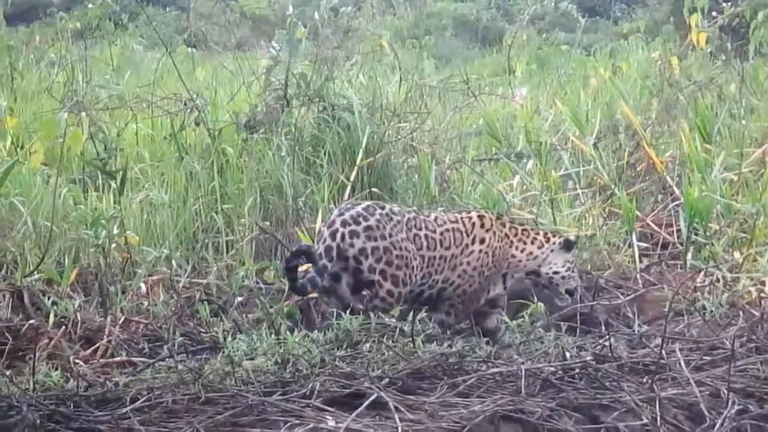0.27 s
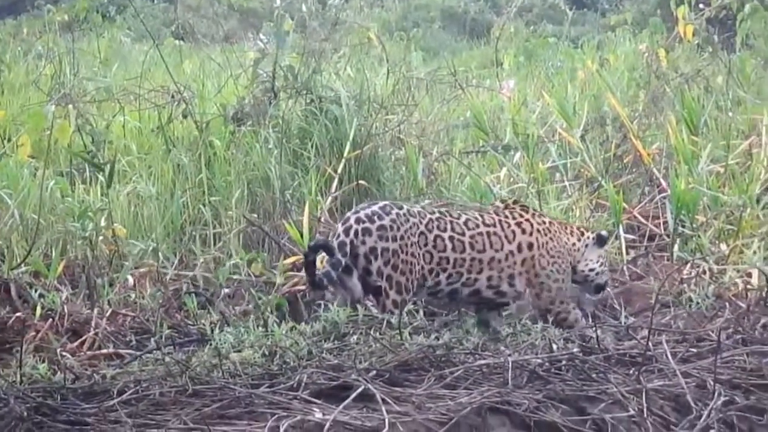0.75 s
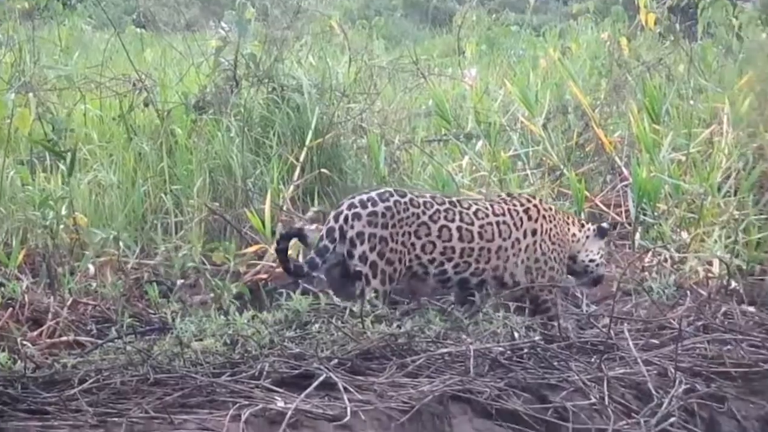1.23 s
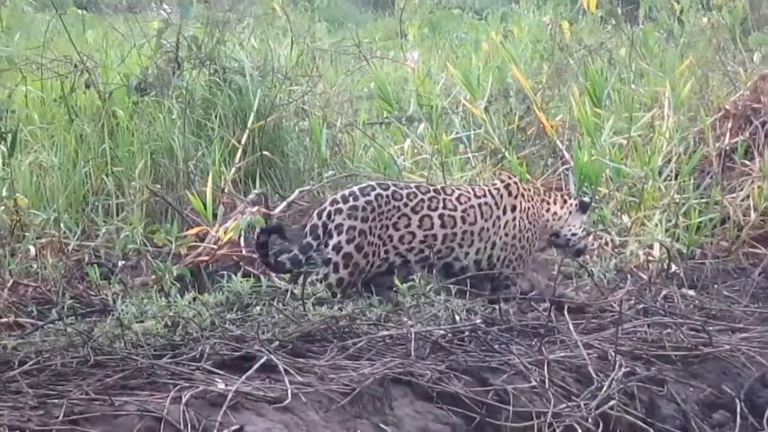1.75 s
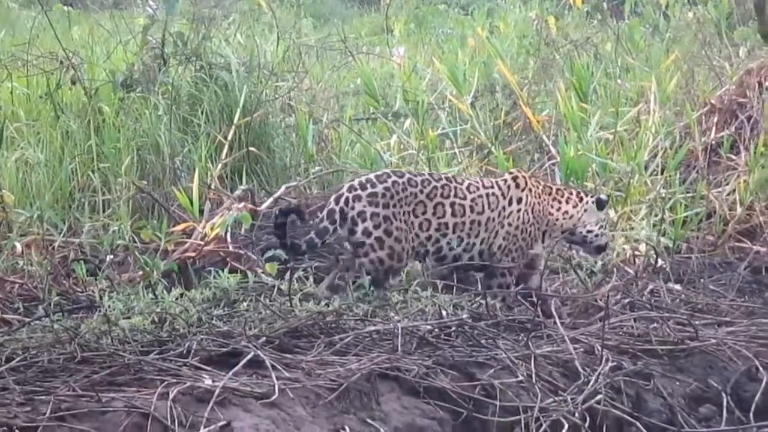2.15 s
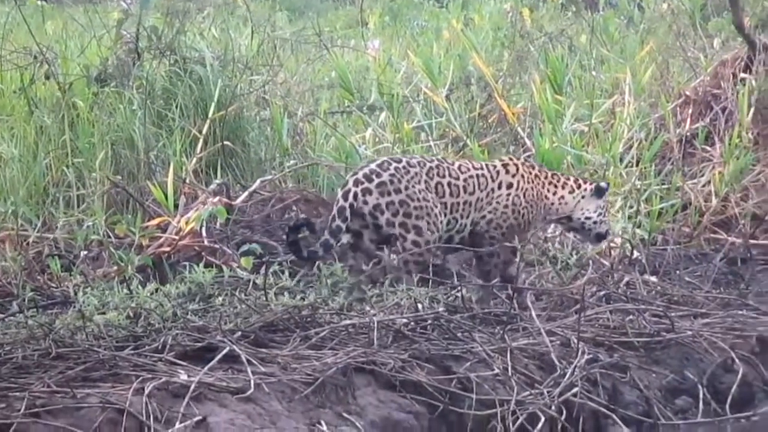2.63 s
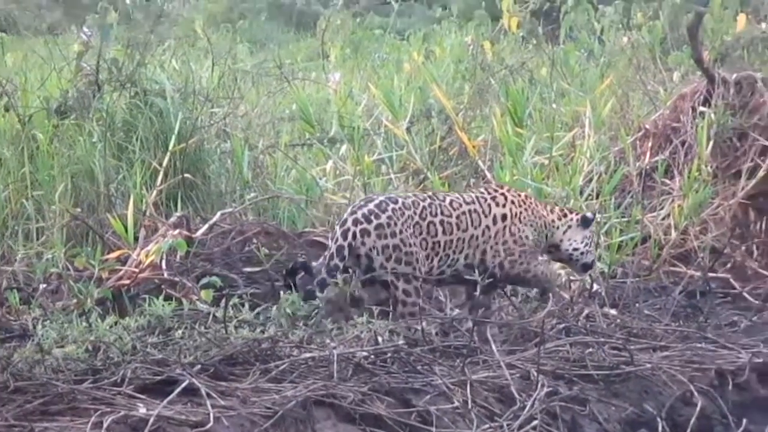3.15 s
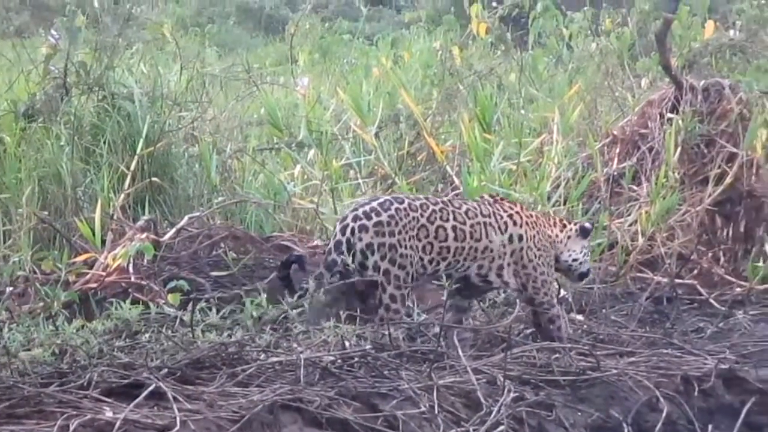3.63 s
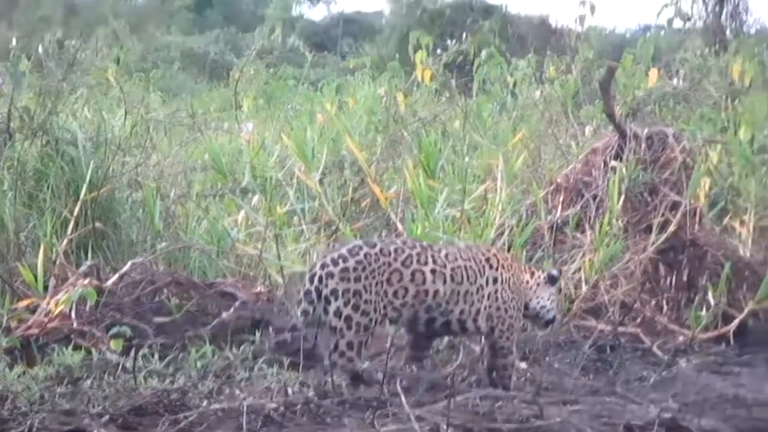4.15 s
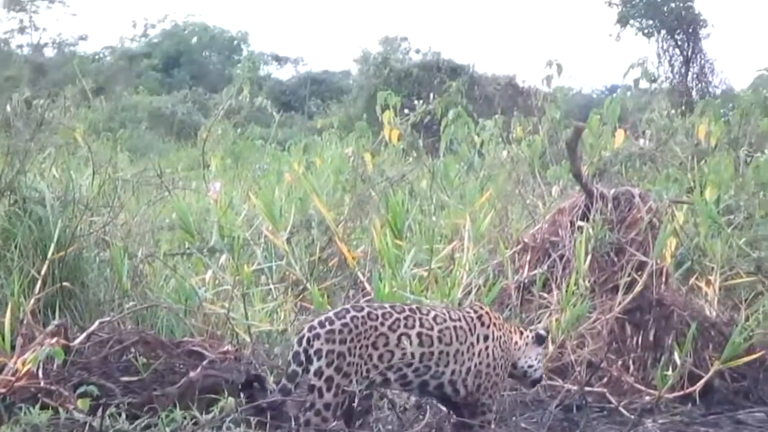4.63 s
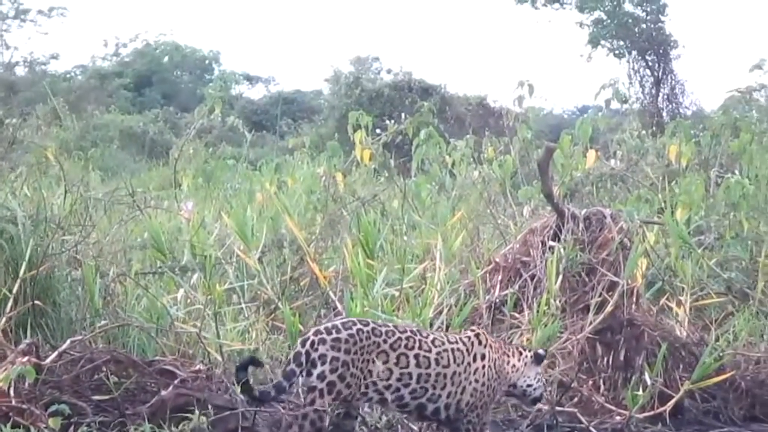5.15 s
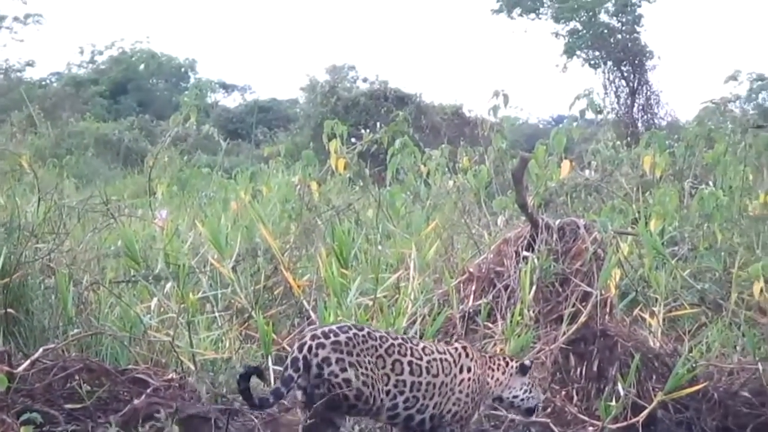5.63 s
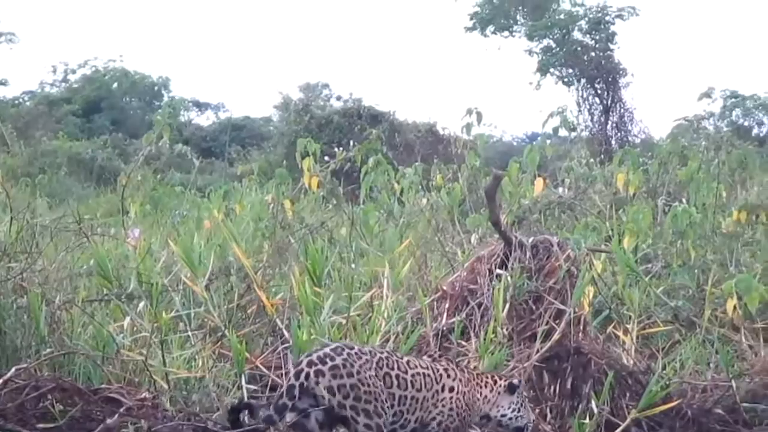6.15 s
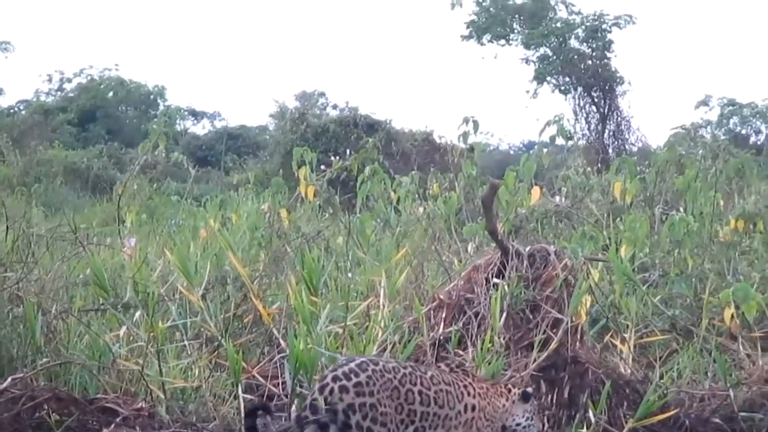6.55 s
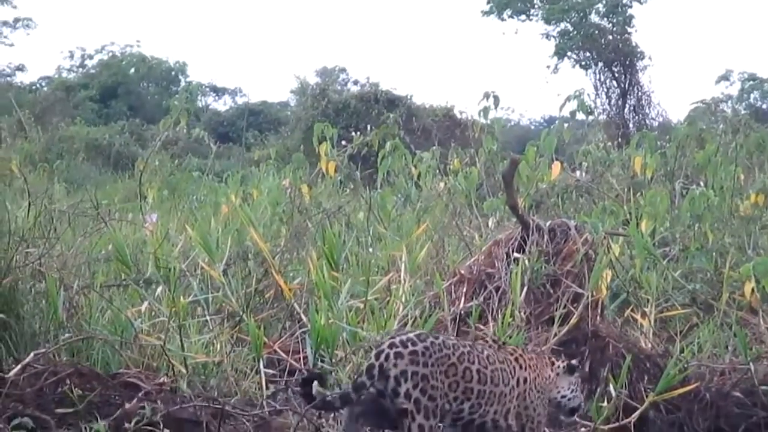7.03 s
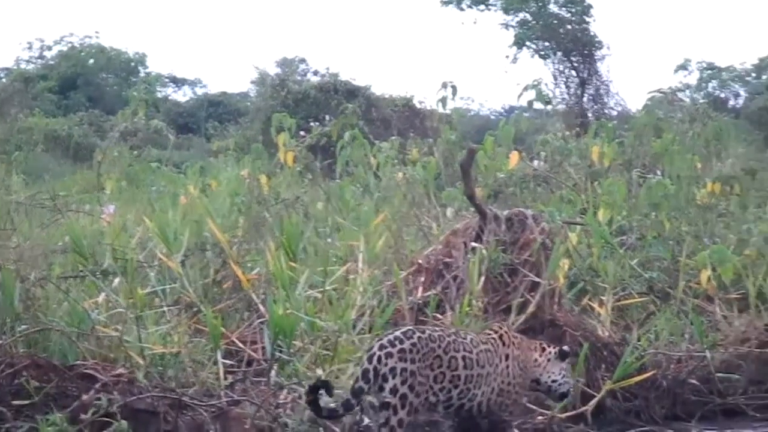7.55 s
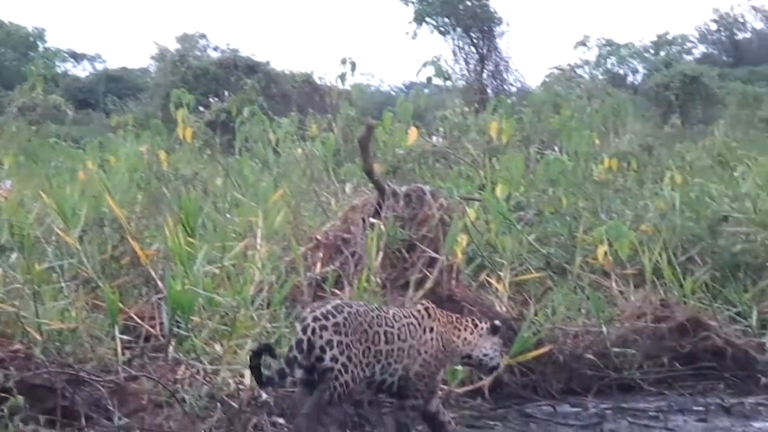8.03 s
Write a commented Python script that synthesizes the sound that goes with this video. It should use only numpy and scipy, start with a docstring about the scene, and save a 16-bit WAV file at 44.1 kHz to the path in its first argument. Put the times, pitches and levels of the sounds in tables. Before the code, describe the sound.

A bird gives rising, breaking squeals over quiet lapping water, small chirps and tiny ticks; one loud rattling knock bangs close by midway.

```python
"""Squealing bird by the reeds

A marshy river bank heard from a small boat. A bird repeats a rising, breaking squeal, built from harmonics
that a throat resonance lights up; small birds and insects, gliding and pulsed tones, call further off.
Water laps and drips, the reeds rustle and crack: shaped noise, and taps into short damped rings.
A lens mechanism ticks and whines near the microphone, and once something is shoved across the boat
with a loud, rattling knock: scraping grains, hull booms, clatter and crunch."""
import sys
import numpy as np
from scipy import signal
from scipy.fft import rfft, irfft
from scipy.io import wavfile
from scipy.ndimage import uniform_filter1d

SR = 44100
rng = np.random.default_rng(int(sys.argv[2]) if len(sys.argv) > 2 else 0)


def dump_mix(stems):
    """Bounce the given channels to the path in sys.argv[1] as a 16-bit WAV at rate SR."""
    frames = np.atleast_2d(stems).T  # one column per channel
    limited = np.clip(frames, -1, 1)  # hard clip at full scale
    pcm = np.round(limited * 32767).astype(np.int16)
    wavfile.write(sys.argv[1], SR, pcm)


N = 365148
T = np.arange(N) / SR


def undb(db):
    """Decibels to gain."""
    return 10 ** (np.asarray(db) / 20)


def unit(x):
    """Scale to rms 1."""
    return x / np.std(x)


def peak(x, db):
    """Scale to a peak level."""
    return x * undb(db) / np.abs(x).max()


def add(out, start_s, x):
    """Mix a short sound in at a start time."""
    i = max(int(start_s * SR), 0)
    out[i:i + len(x)] += x[:max(N - i, 0)]


def starting_at(x, start_s):
    """Turn a signal round so that it begins with what it held at start_s."""
    return np.roll(x, -int(start_s * SR))


def walk(rate_hz):
    """Smooth random wander with spread 1: noise low-passed at rate_hz."""
    lowpass = signal.butter(2, rate_hz, fs=SR, output="sos")
    settled = signal.sosfilt(lowpass, rng.standard_normal(N + SR))[SR:]
    return unit(settled)


def colour(x, points):
    """Shape by a (Hz, dB) spectrum; rms 1."""
    hz, db = np.transpose(points)
    f = np.maximum(np.arange(N // 2 + 1) * SR / N, 1)
    gain = undb(np.interp(np.log(f), np.log(hz), db))
    return unit(irfft(rfft(x) * gain, N))


def grains(rate, spread_db):
    """Random clicks, rate a second, most of them small; rms 1."""
    size = undb(spread_db * np.minimum(rng.exponential(size=N), 5))
    strikes = rng.random(N) < rate / SR
    return unit(strikes * size * rng.standard_normal(N))


def decay(t, t60):
    """A fall of 60 dB in t60 seconds."""
    return np.exp(-np.log(1000) * t / t60)


def ring(modes):
    """The answer of damped modes (Hz, dB, t60 s) to one tap."""
    t = T[:SR // 4]
    swing = sum(undb(db) * np.sin(2 * np.pi * hz * t) * decay(t, t60) for hz, db, t60 in modes)
    # a small body radiates little below its lowest mode
    highpass = signal.butter(1, modes[0][0] / 2, "high", fs=SR, output="sos")
    return signal.sosfilt(highpass, swing)


def contact(t60, grit):
    """A tap followed by a short gritty chatter."""
    t = T[:SR // 20]
    return (t == 0) + grit * rng.standard_normal(len(t)) * decay(t, t60)


def sing(hz):
    """A sine that follows a moving pitch."""
    return np.sin(2 * np.pi * np.cumsum(hz) / SR)


# the squealing bird's throat resonance: hz, relative_db
THROAT_RESONANCE = [(950, -38), (1400, -9), (1850, -2), (2200, 2), (2700, 6.5), (3150, -7), (3700, -16),
                    (7500, -11)]
RESONANT_HZ = 1285  # pitch that lights up the throat
PRESS_DB_PER_OCTAVE = 10  # above that pitch, each overtone past the second gains this on the one below


def syllable(hz, db, waver, voice):
    """Harmonics of a gliding pitch, lit up in turn as they cross the throat resonance; db is the level on resonance."""
    hz = uniform_filter1d(hz, size=200) * (1 + waver[:len(hz)])
    k = np.arange(1, len(voice) + 1)[:, None]
    throat_hz, throat_db = np.transpose(THROAT_RESONANCE)
    lit_db = np.interp(k * hz, throat_hz, throat_db - throat_db.max())
    voice_db = np.array(voice)[:, None] - max(voice)
    pressed_db = PRESS_DB_PER_OCTAVE * np.maximum(np.log2(hz / RESONANT_HZ), 0) * np.maximum(k - 2, 0)
    harmonics = undb(lit_db + voice_db + pressed_db) * np.sin(2 * np.pi * k * np.cumsum(hz) / SR)
    tone = np.sqrt(2) * harmonics.sum(0)
    return tone * undb(db) * signal.windows.tukey(len(hz), .08)


LOW_HZ, QUAVER_HZ = 670, 111.7  # pitch at rest, depth of the quaver
LEAD_S, SWELL_DB_PER_S = 0.1, 63  # the squeal swells for this long before it reaches the resonance
PUSH_DB, PUSH_S = 3, 0.0096  # how far effort stands out at the resonance, and how briefly
GLIDE_BEND = .72  # the last glide flattens (1 = straight)


def squeal(rise, stall, quavers, glide, end_hz, fade):
    """Pitch and effort of one squeal: it climbs ever faster to the resonance, may quaver there, then glides to its end."""
    t = np.arange(-LEAD_S, stall + glide, 1 / SR)
    before, during, after = np.minimum(t, 0), np.clip(t, 0, stall), np.clip((t - stall) / glide, 0, 1)
    climb = (RESONANT_HZ - LOW_HZ) * np.exp(before / rise)
    last_glide = (end_hz - RESONANT_HZ) * after ** GLIDE_BEND
    quaver = QUAVER_HZ * np.sin(2 * np.pi * quavers * during)
    push_db = PUSH_DB * (np.exp(-((t - during) / PUSH_S) ** 2) - 1)
    effort_db = SWELL_DB_PER_S * before - fade * (t - before) + push_db
    return LOW_HZ + climb + last_glide + quaver, effort_db


# squeals: resonance_s (when the pitch gets there), rise_s, stall_s, quavers_per_s (negative dips first),
# glide_s, end_pitch_hz, level_db (before squeal_trim_db), fade_db_per_s (negative grows),
# tremble (share of the pitch)
SQUEAL_CALLS = [(1.054, 0.046, 0.08, 39.5, 0.11, 1936, -51, 2, 0.019),
                (1.886, 0.039, 0.0026, 2.5, 0.1, 1870, -42.5, 32, 0.035),
                (2.636, 0.029, 0.0022, 0.5, 0.11, 1900, -45.5, 4, .005),
                (3.389, 0.036, 0.0035, -1, .074, 1820, -43.5, 30, 0.0056),
                (4.215, 0.059, 0, 0, .097, 1855, -44.5, 25, .008),
                (5.058, .046, 0, 0, 0.13, 1886, -45, -5, .005)]
# the whistle a squeal breaks into: start_s, hold_s, pitch_hz, glide_hz_per_s, level_db (before break_trim_db)
WHISTLE_BREAKS = [(1.228, 0.0084, 2840, 12000, -50), (1.251, 0.028, 2670, -11000, -48),
                  (1.974, .008, 2900, 6000, -43), (1.993, 0.0096, 2730, 7000, -39.5),
                  (2.734, .018, 2770, 7000, -48), (3.464, .016, 2784, 6000, -43.5),
                  (4.314, 0.027, 2760, -2500, -45), (5.193, 0.0067, 2630, -1500, -44.5)]
# weak squeals that falter and sink instead of breaking, one curve each:
# time_s, pitch_hz, level_db, tremble (share of the pitch)
FALTERING_SQUEALS = [
    [(.3, 998, -50, 0.084), (.41, 1297, -56, 0.046), (0.426, 1433, -40, .01), (.44, 980, -51, .01),
     (.467, 1386, -54, .03), (.505, 1310, -68, .05), (.52, 1110, -48, .02), (.54, 950, -53, .02)],
    [(8.09, 850, -65, .05), (8.165, 896, -54, .03), (8.186, 1200, -49, .01), (8.196, 1496, -49, .005),
     (8.224, 1518, -50, .005), (8.25, 1180, -62, .01)],
]
# strength of harmonics 1, 2, .. in the reedy squeal and in the nearly pure whistle: relative_db
REEDY_VOICE = [4.5, 4.5, -2.5, -9]
PURE_VOICE = [0, -8]
BREAK_RELEASE_S, BREAK_FADE_DB_PER_S = 0.04, 600


def squealer(squeal_trim_db=1, break_trim_db=2, tremble_hz=48):
    """A reedy, trembling, rising squeal that breaks into a short, nearly pure whistle."""
    out, waver = np.zeros(N), 0.012 * walk(73)
    shake = np.sin(2 * np.pi * tremble_hz * T + 1.4 * walk(26.3))
    for curve in FALTERING_SQUEALS:
        s, hz, db, tremble = np.transpose(curve)
        t = np.arange(s[0], s[-1], 1 / SR)
        pitch = np.interp(t, s, hz) * (1 + np.interp(t, s, tremble) * shake[:len(t)])
        add(out, s[0], syllable(pitch, np.interp(t, s, db), waver, REEDY_VOICE))
    for s, rise, stall, quavers, glide, end_hz, db, fade, tremble in SQUEAL_CALLS:
        hz, effort_db = squeal(rise, stall, quavers, glide, end_hz, fade)
        unsteady = starting_at(waver + tremble * shake, s)
        add(out, s - LEAD_S, syllable(hz, db + squeal_trim_db + effort_db, unsteady, REEDY_VOICE))
    for s, hold, hz, slope, db in WHISTLE_BREAKS:
        t = np.arange(0, hold + BREAK_RELEASE_S, 1 / SR)
        level_db = db + break_trim_db - BREAK_FADE_DB_PER_S * np.maximum(t - hold, 0)
        add(out, s, syllable(hz + slope * t, level_db, starting_at(waver, s), PURE_VOICE))
    return out


# jolts within the shove: start_s, hull_peak_db, clatter_peak_db, crunch_db (before crunch_trim_db)
SHOVE_JOLTS = [(3.918, -31, -40, -39), (3.93, -39, -34, -34), (3.953, -32, -22.5, -50),
               (3.966, -17.5, -29, -37), (3.974, -20, -21, -33), (3.985, -39, -21.5, -31.5),
               (3.998, -25, -18, -37), (4.015, -17.5, -33, -43), (4.029, -32, -24.5, -35.5)]
# what the boat rings with: pitch_hz, relative_db, t60_s (the load shortens it in the booms)
HULL_MODES = [(269.7, 1, 0.27), (349, 7.5, 0.16), (376, 5, 0.1), (411, 11, 0.099), (517, 5.5, 0.1),
              (753, -0.5, 0.11), (790, 0.5, 0.1), (910, 0, .07), (1080, 4, 0.097), (1840, -7, .05)]
# what the hard, loose part rings with: pitch_hz, relative_db, t60_s
CLATTER_MODES = [(2800, 3, 0.024), (2900, 6.5, 0.023), (3150, 5, 0.03), (3250, -1, 0.015),
                 (5500, -8, 0.017), (6320, -0.5, 0.0091)]
# spectrum of the scraping: hz, relative_db
SCRAPE_SPECTRUM = [(50, -30), (120, -34), (185, -36), (245, -9), (400, 1), (700, 3), (1100, 2.5),
                   (1600, 1.5), (2100, -5), (3100, -7), (4500, -13.5), (6600, -20), (9000, -28),
                   (15000, -51)]
# spectrum of the crushed grit: hz, relative_db
CRUNCH_SPECTRUM = [(500, -22), (1600, 2), (3000, 5), (4500, 1), (6500, -2.5), (8500, -8.5), (11000, -15),
                   (15500, -37)]
SHOVE_S, SHOVE_ATTACK_S, SHOVE_HOLD_S, SHOVE_FADE_DB_PER_S = 3.909, 0.0069, 0.11, 800
CRUNCH_S, CRUNCH_LEAD_S = 0.015, 0.0057  # each jolt crushes grit for this long, starting just before it lands


def knock(scrape_db=-30.5, hull_db=-36.5, crunch_trim_db=1.5, squeak_s=3.911, squeak_hz=1450, judder_db=1.3):
    """Something squeaks loose, scrapes and jolts over the boat: the hull booms, grit crunches, a hard part clatters."""
    since = T - SHOVE_S
    fade_db = SHOVE_FADE_DB_PER_S * np.clip(since - SHOVE_ATTACK_S - SHOVE_HOLD_S, 0, 1)
    force = np.clip(since / SHOVE_ATTACK_S, 0, 1) * undb(judder_db * walk(79) - fade_db)
    slips, hull, clatter = grains(rate=16000, spread_db=1.2), ring(HULL_MODES), ring(CLATTER_MODES)
    out = undb(scrape_db) * force * colour(slips, SCRAPE_SPECTRUM)
    # the same slips set the hull ringing
    out += undb(hull_db) * signal.fftconvolve(force * slips, hull / np.linalg.norm(hull))[:N]
    t = T[:len(hull)]
    squeak = ring([(squeak_hz, 0, .1)]) * np.minimum(t / 0.0069, 1)
    add(out, squeak_s, peak(squeak, -32))
    # the load lands softly on the hull, then damps its ring
    damped_hull = hull * np.minimum(t / .002, 1) * np.exp(-t / .011)
    boom = np.convolve(damped_hull, np.hanning(SR // 900))
    boom = signal.sosfilt(signal.butter(4, 190, "high", fs=SR, output="sos"), boom)
    crush = np.zeros(N)
    for s, boom_db, clatter_db, grit_db in SHOVE_JOLTS:
        add(out, s, peak(boom, boom_db))
        add(out, s, peak(signal.fftconvolve(contact(t60=0.031, grit=0.95), clatter), clatter_db))
        add(crush, s - CRUNCH_LEAD_S, undb(grit_db + crunch_trim_db) * np.hanning(int(CRUNCH_S * SR)))
    out += crush * colour(grains(rate=8000, spread_db=2.0), CRUNCH_SPECTRUM)
    # a gentle low-pass takes the edge off the whole shove
    return signal.sosfilt(signal.butter(2, 11500, fs=SR, output="sos"), out)


def chirp(length, start_hz, end_hz, db, arch, rasp):
    """One arched, slightly rough glide."""
    along = np.linspace(0, 1, int(length * SR))
    glide = start_hz + (end_hz - start_hz) * along
    bend = arch * (np.sin(np.pi * along) - np.pi / 4)
    return sing(glide * (1 + bend + rasp[:len(along)])) * np.hanning(len(along)) * undb(db)


# small birds: middle_s, length_s, start_hz, end_hz, arch (share of the pitch), level_db (before chirp_trim_db)
SMALL_BIRD_CHIRPS = [(0.247, 0.041, 3870, 3500, 0.071, -49), (0.258, .06, 7800, 7200, .02, -54),
                     (1.167, 0.059, 3050, 3570, 0.0057, -56), (1.705, 0.054, 3200, 3700, .02, -63),
                     (1.748, 0.1, 3000, 2900, .12, -58), (1.836, 0.011, 3850, 3100, 0.095, -49),
                     (1.874, .11, 3250, 3400, 0.15, -59), (1.878, 0.12, 4000, 4090, 0.17, -62),
                     (3.297, .03, 2700, 3700, .03, -59), (3.298, 0.028, 4200, 4000, .25, -59),
                     (3.32, 0.042, 3400, 4700, 0.043, -52), (3.336, .012, 3800, 5000, .02, -52),
                     (3.349, 0.04, 3100, 3060, 0.059, -48), (3.363, 0.014, 4000, 5000, .02, -50),
                     (3.371, .034, 3110, 2700, 0.12, -53), (3.399, 0.036, 4400, 4530, -.05, -48),
                     (3.476, 0.058, 4120, 4220, 0.084, -55), (3.527, 0.035, 4000, 3950, 0.12, -53),
                     (4.719, 0.026, 3620, 2820, 0.0017, -51), (4.812, 0.026, 3500, 3240, .02, -48),
                     (4.878, 0.026, 3280, 3290, -0.017, -52), (6.398, 0.054, 3000, 2800, .1, -56),
                     (6.597, 0.048, 4170, 4150, 0.056, -60), (6.775, 0.041, 3250, 2900, 0.048, -51.5),
                     (6.973, 0.07, 4550, 4130, 0.015, -55.5), (7.366, 0.017, 3400, 3640, -0.019, -57),
                     (7.413, 0.06, 4400, 4500, 0.017, -60), (7.652, 0.019, 3420, 3520, 0.045, -52),
                     (7.92, 0.028, 3250, 2340, -0.0034, -54), (7.938, 0.033, 2500, 2420, 0.056, -53.5),
                     (8.06, .07, 3150, 3100, .05, -59), (8.087, 0.023, 3080, 2650, .03, -54),
                     (8.128, .05, 2900, 3150, 0.055, -58), (8.204, 0.037, 3400, 3400, 0.05, -52),
                     (8.238, .035, 4950, 5150, .02, -64), (8.253, 0.032, 3300, 2010, 0.12, -56)]
# a run of evenly spaced, steep down-slurs from a bird in the reeds
CHATTER_S, CHATTER_END_S, CHATTER_GAP_S = 6.338, 7.55, 0.1295
SLUR_S, SLUR_TOP_HZ, SLUR_END_HZ, SLUR_DB = 0.043, 4400, 3150, -53


def small_birds(chirp_trim_db=3):
    """Scattered chirps and one chattering run, each a short glide with a rasp in its pitch."""
    out, rasp = np.zeros(N), 0.022 * walk(460)
    for s, length, start_hz, end_hz, arch, db in SMALL_BIRD_CHIRPS:
        note = chirp(length, start_hz, end_hz, db + chirp_trim_db, arch, starting_at(rasp, s))
        add(out, s - length / 2, note)
    for s in np.arange(CHATTER_S, CHATTER_END_S, CHATTER_GAP_S):
        add(out, s, chirp(SLUR_S, SLUR_TOP_HZ, SLUR_END_HZ, SLUR_DB, -0.041, 3.4 * starting_at(rasp, s)))
    return out


def birds(scatter_db=-11):
    """The squealing bird and the small chirpers, with a faint scatter from the bank: a decaying noise tail."""
    calls = squealer() + small_birds()
    scatter = rng.standard_normal(SR) * np.exp(-T[:SR] / 0.047)
    return calls + undb(scatter_db) * signal.fftconvolve(calls, scatter / np.linalg.norm(scatter))[:N]


# lens ticks: start_s, peak_db
LENS_TICKS = [(0.0642, -33.5), (0.545, -31.5), (1.405, -29.5), (2.0643, -25), (2.3046, -32),
              (2.7062, -32.5), (3.0249, -29), (3.5057, -32), (4.066, -33.5), (4.304, -31.5), (4.9449, -31),
              (5.5045, -33.5), (5.907, -31.5), (6.626, -34), (7.427, -33), (7.667, -30), (8.066, -33)]
# what a tick rings with: pitch_hz, relative_db, t60_s
LENS_MODES = [(782, -6, 0.042), (1237, -8, 0.049), (1427, 5.5, 0.031), (1533, 6.5, 0.015),
              (2500, 4.5, 0.0047), (3400, 2.5, 0.0075), (3820, -5.5, 0.031), (5670, -5.5, 0.011)]


def lens(whine_hz=11795, whine_db=-80):
    """Plastic ticks, each with a brief chatter, and a thin electronic whine."""
    out, body = np.zeros(N), ring(LENS_MODES)
    for s, db in LENS_TICKS:
        add(out, s, peak(signal.fftconvolve(contact(t60=0.021, grit=0.29), body), db))
    return out + undb(whine_db) * np.sqrt(2) * sing(whine_hz + 5 * walk(40))


GRIT_PER_S = 18  # the longer a contact, the more it chatters


def crack(t60):
    """A dry contact whose chatter is held to the middle of the spectrum."""
    soften = signal.butter(2, [600, 4500], "band", fs=SR, output="sos")
    tap = contact(t60, grit=GRIT_PER_S * t60)
    return tap, signal.sosfilt(soften, tap)


# dry reed cracks: start_s, peak_db, chatter_t60_s
REED_CRACKS = [(0.057, -30.5, 0.013), (0.192, -39, 0.018), (0.363, -39, .025), (0.7296, -33.5, 0.0066),
               (1.572, -40, 0.025), (1.614, -40.5, .03), (1.652, -40, 0.027), (1.92, -28.5, 0.009),
               (2.443, -35.5, 0.02), (2.493, -29.5, 0.005), (3.0854, -22, 0.0057), (4.543, -29.5, 0.021),
               (5.45, -32, 0.049), (6.9126, -31, 0.023), (7.1062, -28, 0.014), (7.959, -35.5, 0.019)]


def reed_cracks():
    """Reeds crack dryly: softened taps without a ring."""
    out = np.zeros(N)
    for s, db, t60 in REED_CRACKS:
        add(out, s, peak(crack(t60)[1], db))
    return out


# drips: start_s, peak_db, ring_hz, t60_s
WATER_DRIPS = [(.177, -28, 2170, 0.0018), (0.667, -32.5, 1900, 0.003), (0.766, -32.5, 1200, 0.0082),
               (0.9629, -28.5, 1210, 0.0025), (1.0762, -17, 1280, 0.0016), (1.1457, -24.5, 2460, 0.00097),
               (1.217, -34, 1210, 0.0055), (1.404, -36, 810, 0.026), (3.319, -31, 1390, 0.0046),
               (3.62, -29.5, 1030, 0.0019), (2.673, -41, 2300, 0.0049), (3.852, -35, 2370, 0.013),
               (4.552, -33.5, 920, 0.011), (4.614, -36.5, 1200, 0.013), (4.668, -42, 856, .014),
               (5.679, -30, 1400, 0.0045), (6.868, -32.5, 1170, 0.0099), (6.9126, -27, 1100, 0.0093),
               (7.057, -39, 2020, .004), (7.31, -34, 714, 0.01), (7.3443, -32.5, 1650, 0.0093),
               (7.446, -35.5, 2650, 0.0087), (7.908, -39, 1950, .014)]


def drips(splash_db=-3):
    """A drip is a crack with a short, muffled ring of two modes."""
    out = np.zeros(N)
    muffle = signal.butter(2, 6000, fs=SR, output="sos")
    for s, db, hz, t60 in WATER_DRIPS:
        tap, splash = crack(t60)
        cavity = ring([(hz, 0, t60), (2.08 * hz, -2, t60 / 2)])
        body = signal.sosfilt(muffle, signal.fftconvolve(tap, cavity))[:len(tap)]
        add(out, s, peak(peak(body, 0) + peak(splash, splash_db), db))
    return out


# plops of water: start_s, peak_db, pitch_hz, t60_s
WATER_PLOPS = [(.292, -39, 306, .018), (.667, -34, 520, 0.0081), (.6995, -40, 280, 0.012),
               (1.0753, -27.5, 560, 0.012), (1.1038, -25, 245, 0.0078), (3.442, -40, 634, 0.025),
               (4.614, -32, 580, 0.04), (4.612, -39, 229, 0.041), (4.668, -35.5, 576, 0.01),
               (4.976, -38, 181, 0.032), (5.63, -44, 207, 0.056), (6.665, -43.5, 135, 0.18),
               (6.913, -37, 790, 0.05), (7.552, -39.5, 208, 0.077), (7.698, -36, 770, .026),
               (7.742, -35.5, 220, 0.017), (7.986, -34, 232, 0.0077), (8.13, -43.5, 240, 0.026)]
# low bumps of water against the hull: start_s, peak_db
HULL_BUMPS = [(4.03, -43.5), (4.891, -40.5), (4.973, -43.5), (7.72, -43), (8.119, -43)]
BUMP_HZ, BUMP_T60_S = 73.4, 0.23


def plops():
    """Plops and bumps are soft, damped cavities of water: one mode with a rounded start."""
    out = np.zeros(N)
    bumps = [(s, db, BUMP_HZ, BUMP_T60_S) for s, db in HULL_BUMPS]
    for s, db, hz, t60 in list(WATER_PLOPS) + bumps:
        add(out, s, peak(np.convolve(ring([(hz, 0, t60)]), np.hanning(SR // 1000)), db))
    return out


# insect trills: start_s, length_s, opening_hz, level_db (before the pulsing and a small flutter)
INSECT_TRILLS = [(3.735, 0.42, 4620, -65), (5.309, 0.48, 4680, -61), (7.019, 0.36, 4750, -59.5)]
# spectrum of the steady chorus: hz, relative_db
CHORUS_SPECTRUM = [(6500, -9), (7600, -4), (8170, 5), (8550, -13.5), (10000, -14.5), (12000, -34),
                   (15500, -33)]
TRILL_HZ, OPENING_S, OPENING_DB = 4875, 0.085, -0.5  # a trill opens low and soft, then steps up to its pitch


def insects(pulse_hz=30.4, chorus_db=-67):
    """Pulsed trills that come and go over a steady high chorus."""
    trills, waver = np.zeros(N), 1 + 0.0085 * walk(230)
    for s, length, opening_hz, db in INSECT_TRILLS:
        t = T[:int(length * SR)]
        opening = t < OPENING_S
        hz = np.where(opening, opening_hz, TRILL_HZ) * waver[:len(t)]
        pulses = 0.22 + 0.81 * np.abs(np.sin(np.pi * pulse_hz * t))
        pulses = pulses * signal.windows.tukey(len(t), .08)
        add(trills, s, undb(db + OPENING_DB * opening) * pulses * sing(hz))
    chorus = undb(chorus_db) * colour(rng.standard_normal(N), CHORUS_SPECTRUM)
    return trills * undb(1.2 * walk(18)) + chorus


def patter(count=56, loudest_db=-42):
    """Faint stray pops along the water's edge: taps with a very short ring."""
    out = np.zeros(N)
    for when, softness, pitch in rng.random((count, 3)):
        pop = signal.fftconvolve(contact(t60=0.005, grit=0.35), ring([(900 * 4 ** pitch, 0, .006)]))
        add(out, when * N / SR, peak(pop, loudest_db - 9 * softness))
    return out


# swishes of water and reeds, added as power to the steady beds: middle_s, length_s, wash_db, rustle_db
BANK_SWISHES = [(0.282, .055, -53, -56.5), (0.363, 0.086, -57, -59.5), (1.85, 0.32, -55.5, -62.5),
                (2.126, 0.2, -51.5, -59), (3.487, 0.12, -51.5, -58.5), (3.81, 0.19, -58.5, -64),
                (4.22, 0.39, -52, -63.5), (4.624, 0.27, -57.5, -74), (4.905, 0.23, -48, -58.5),
                (5.135, 0.12, -56, -72), (5.433, 0.084, -65, -62), (6.705, 0.54, -53.5, -63),
                (6.876, .021, -46, -71), (7.326, 0.095, -47.5, -62), (7.487, 0.18, -56.5, -71),
                (7.683, 0.2, -52, -57.5), (7.985, 0.5, -58, -87)]
# spectrum of the lapping: hz, relative_db
LAP_SPECTRUM = [(18, -16), (35, -1.5), (70, -2.5), (130, -3.5), (250, -6), (430, -11.5), (900, -43.5)]
# spectrum of the small ripples: hz, relative_db
WASH_SPECTRUM = [(200, -8.5), (420, -2), (680, 0), (1500, -4), (2200, -6.5), (3200, -7.5), (4500, -16),
                 (8000, -47)]
# spectrum of the reeds: hz, relative_db
RUSTLE_SPECTRUM = [(1800, -19), (3500, -1), (5000, 0), (7500, -2), (9500, -8.5), (12000, -18), (15500, -32)]


def bank(lap_db=-56, stir_db=3, wash_db=-57, rustle_db=-67):
    """Slow lapping, a fizzing wash of small ripples, and dry crackle in the reeds: noise and grains that swell."""
    wash_power, rustle_power = undb(wash_db) ** 2, undb(rustle_db) ** 2
    for s, length, water_db, reeds_db in BANK_SWISHES:
        swell = np.exp(-(2 * (T - s) / length) ** 2)
        wash_power = wash_power + swell * undb(water_db) ** 2
        rustle_power = rustle_power + swell * undb(reeds_db) ** 2
    # the lapping grows a little with the wash
    stir = np.sqrt(wash_power / wash_power.max())
    lap = undb(lap_db + stir_db * stir + 2.2 * walk(9.5)) * colour(rng.standard_normal(N), LAP_SPECTRUM)
    ripples = colour(grains(rate=11000, spread_db=2.0), WASH_SPECTRUM)
    wash = np.sqrt(wash_power) * undb(1.75 * walk(30)) * ripples
    crackle = colour(grains(rate=20000, spread_db=2.0), RUSTLE_SPECTRUM)
    rustle = np.sqrt(rustle_power) * undb(2.57 * walk(49)) * crackle
    return lap + wash + rustle


def scene():
    """All sources at one microphone."""
    animals = birds() + insects()
    water = drips() + plops() + patter() + bank()
    return (animals + knock() + lens() + reed_cracks() + water)[None]


TOP_HZ = 15850


def record(dry):
    """The recorder cuts the top with a steep low-pass."""
    return signal.sosfilt(signal.ellip(10, .2, 60, TOP_HZ, fs=SR, output="sos"), dry)


dry = scene()
out = record(dry)
dump_mix(out)
```